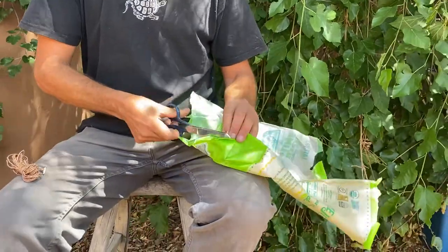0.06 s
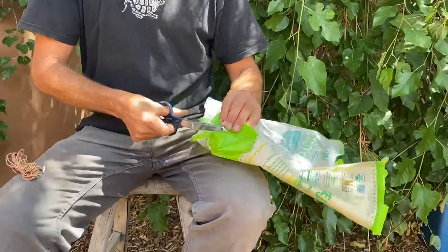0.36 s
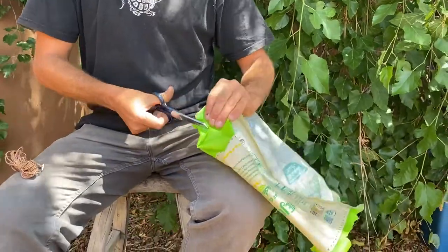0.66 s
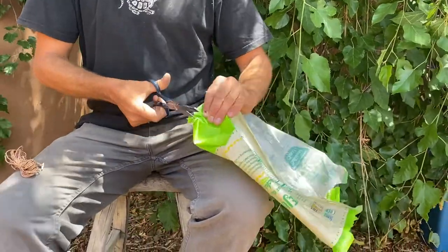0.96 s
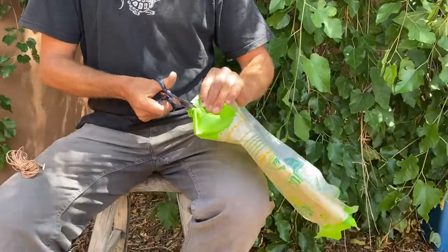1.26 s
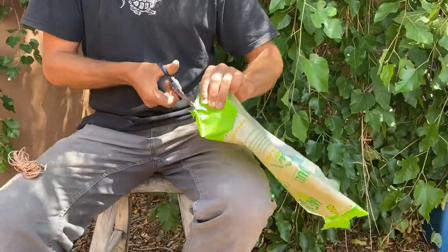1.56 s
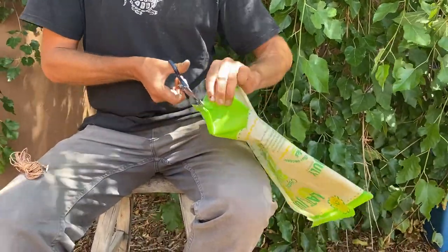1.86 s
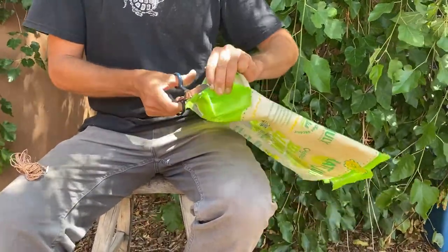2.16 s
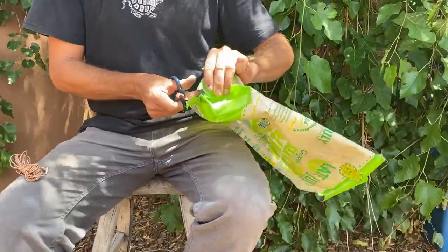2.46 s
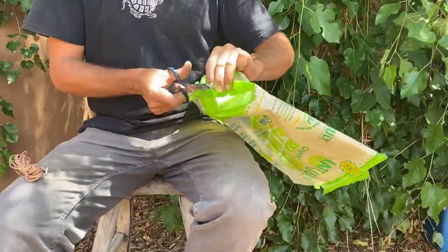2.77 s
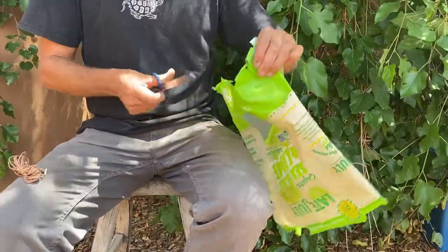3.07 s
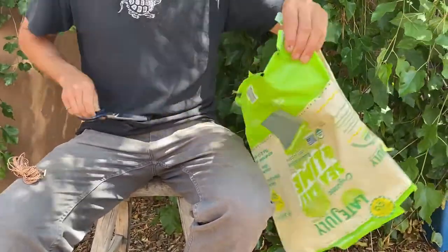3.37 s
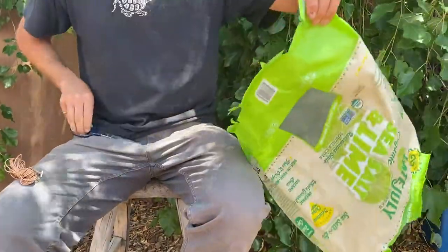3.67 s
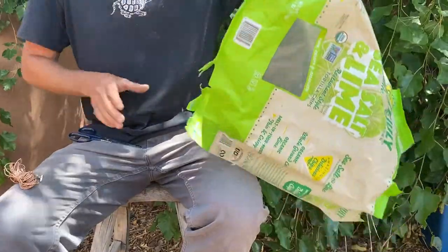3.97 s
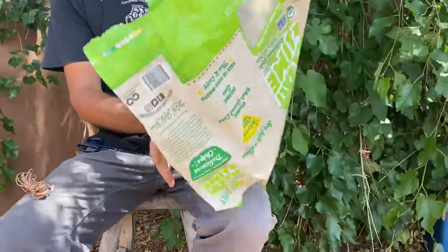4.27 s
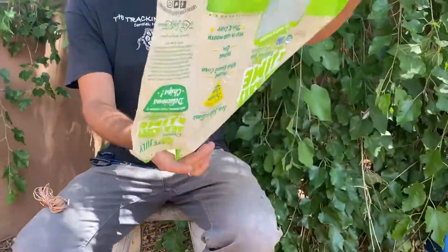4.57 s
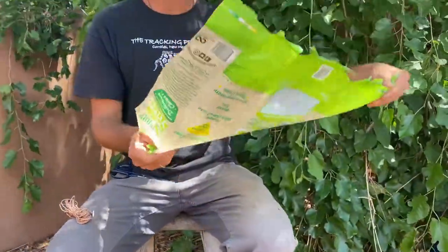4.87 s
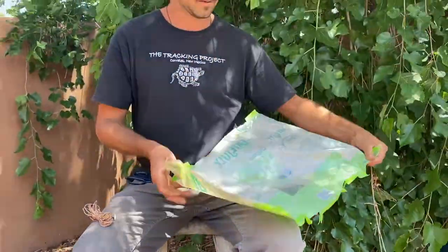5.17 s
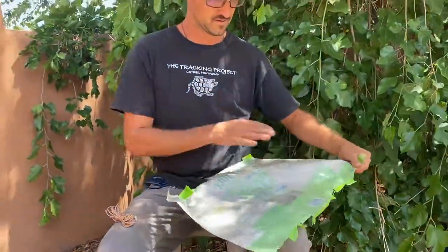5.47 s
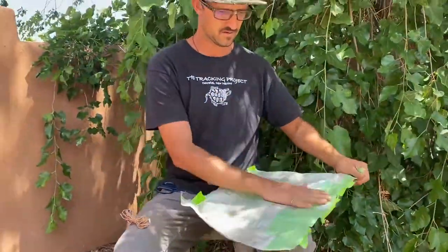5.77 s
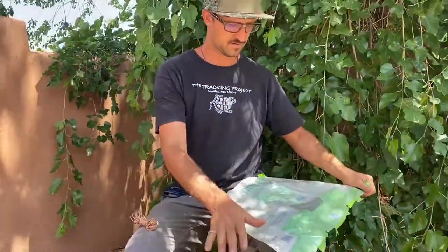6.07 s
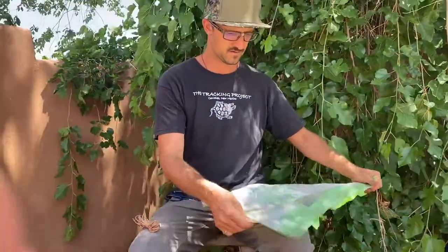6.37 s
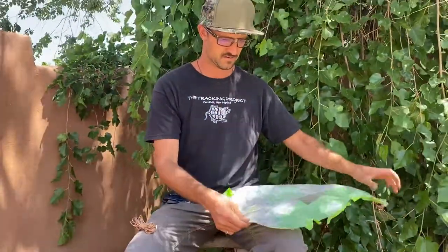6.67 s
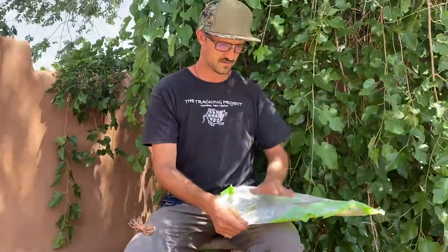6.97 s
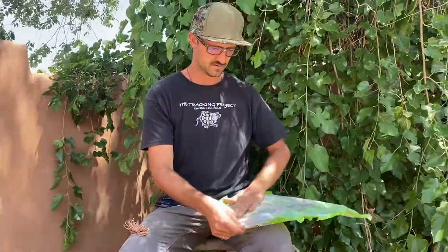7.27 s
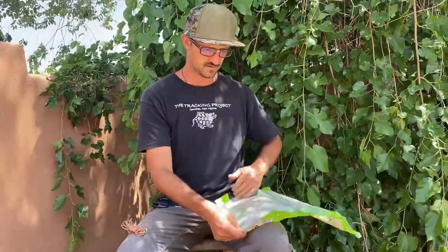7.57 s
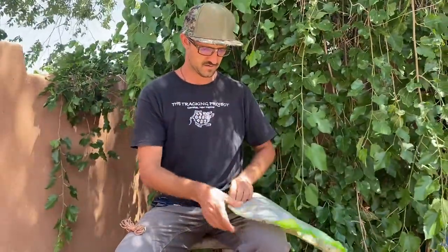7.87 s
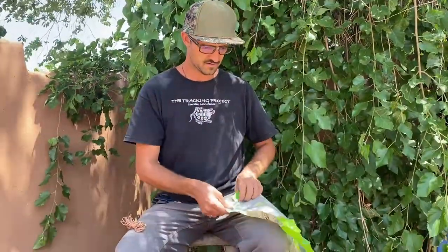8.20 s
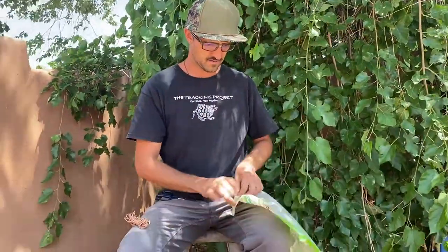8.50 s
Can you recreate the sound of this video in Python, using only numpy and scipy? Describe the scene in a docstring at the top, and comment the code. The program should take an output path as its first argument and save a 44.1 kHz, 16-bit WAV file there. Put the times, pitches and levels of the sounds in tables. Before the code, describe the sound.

A foil snack bag is handled close to the microphone over a faint, steady garden background. Sharp snaps and crinkles come as scissors cut it, strongest around 0.3 to 0.9 seconds, then scattered until another cluster near 2.8 seconds. A low puff of wind hits the microphone at about 2.9 seconds. The bag rustles more softly as it is unfolded, then crackles loudly between 4.5 and 5 seconds. From about 5.6 to 6 seconds a palm smooths the sheet over a knee, making a bright hiss with a low, hollow scuff; a brief second swipe follows at 6.4 seconds. From 7 seconds to the end at about 8.7, lighter sliding, crinkles and single snaps continue as the sheet is handled. The breeze also bumps the microphone gently around 1.2, 7.4 and 8.5 seconds.

```python
"""Sharp snaps sound over a quiet garden: a foil snack bag is snipped open, unfolded and smoothed on the lap.
Buckling creases release impulses that ring the facets of the film, as single snaps and swarms of crinkles.
Friction makes the film hiss under the hand, and the palm rubs a low scuff from the sheet on the knee.
A light breeze puffs on the two microphone ports as its eddies pass."""
import sys
import numpy as np
from scipy import signal
from scipy.fft import rfft, irfft
from scipy.io import wavfile
from scipy.ndimage import uniform_filter1d

SR = 44100
rng = np.random.default_rng(int(sys.argv[2]) if len(sys.argv) > 2 else 0)


def wrap_up_sound(samples):
    """Save the sound to the file named by the first command line argument, as 16-bit audio."""
    columns = np.atleast_2d(samples).T
    # keep every value between -1 and 1, then stretch to whole-number steps
    tamed = np.clip(columns, -1, 1)
    steps = np.round(tamed * 32767).astype(np.int16)
    wavfile.write(sys.argv[1], SR, steps)


N = 381024

# loud snaps under blades and fingers: t/s, level/dB, treble-over-bass tilt/dB per band, nominal length/ms
LOUD_SNAPS = [(.0041, -39, -7, 3.3), (.0374, -44.5, -3, .6), (.169, -50.5, 3, .6),
              (0.1946, -40, -0.5, 0.89), (.2915, -46, -0.5, 0.63), (.3037, -29.5, 1, 1.15),
              (0.3518, -30, -0.5, 1.2), (.386, -25, 2.5, .9), (0.3878, -25, -0.5, 1.2),
              (0.4296, -31.5, 7, 0.26), (.5063, -39.5, 4, 0.95), (.5439, -29.5, 3.5, 0.75),
              (.705, -51.5, -6.5, 2.2), (0.7678, -38.5, -3, 1.02), (0.7807, -41, -2, 0.77),
              (.8508, -35, 1.5, 3.6), (1.1752, -44, -13, 2.4), (1.1859, -35, -2.5, 0.75),
              (1.4802, -41, -2.5, 0.43), (1.5116, -46, 0.5, 0.57), (1.5515, -39.5, -4, 0.65),
              (1.6492, -42.5, -8.5, 0.65), (1.7732, -43.5, -7, 1.26), (1.7985, -39.5, -1, 1.13),
              (1.827, -42, -3, 1.43), (1.876, -33, -6.5, 1.43), (1.9607, -46, -6, 4.3),
              (1.99, -35.5, -13.5, 0.61), (2.0578, -31.5, 1.5, 1.74), (2.1649, -41, -4.5, 2.8),
              (2.242, -56.5, -10, 1.5), (2.3868, -44, -4.5, 1.7), (2.4301, -41.5, -1, 1.2),
              (2.4416, -41.5, -4, 0.76), (2.52, -45, 1, 3.4), (2.6545, -46, 4, 0.41),
              (2.6773, -42.5, 2.5, .5), (2.7941, -34, -1.5, 2.4), (2.8181, -30, 0, 1.25),
              (2.8684, -33.5, 1.5, 2.4), (2.889, -36.5, 7, 4.3), (2.9089, -28.5, -5.5, 2.3),
              (3.0028, -39.5, -4, 1.5), (3.395, -50, 0.5, 1), (3.6423, -53.5, -21.5, 3.3),
              (3.6858, -46, -11, 1.7), (3.85, -34.5, 2, 0.37), (4.0739, -50, -11.5, 1.84),
              (4.4996, -32.5, 2.5, 0.35), (4.6746, -47, -3.5, 0.97), (4.7285, -29.5, 1, 0.88),
              (4.7711, -31, -1, 1.2), (4.834, -40, -4, 2.9), (5.026, -60.5, -24.5, 4.1),
              (5.1034, -37.5, -1, 1.75), (5.2155, -39.5, -5.5, 4.7), (5.3, -46, 1.5, 3.07),
              (5.3678, -42.5, 1.5, 2.23), (5.4034, -45.5, -5, 1.4), (5.6729, -40, -1.5, 1.9),
              (5.7509, -41.5, 5.5, 0.27), (5.8972, -33, 1, 1.7), (5.9086, -30.5, 5.5, .4),
              (6.089, -48.5, -4.5, 2.8), (6.333, -50, -6.5, 1.9), (6.6661, -42, 0.5, 1.4),
              (6.6843, -39.5, -3.5, 4), (6.78, -52, -4, 1.6), (6.898, -54.5, -3.5, 0.7),
              (7.0642, -40, 0, 1.48), (7.0846, -41.5, -0.5, 1.4), (7.1072, -39.5, 2, 1.43),
              (7.1907, -36.5, 4.5, 0.96), (7.3193, -35, -3, 1.86), (7.4178, -41, 0.5, 0.97),
              (7.8878, -41.5, -3, 0.51), (7.9254, -37.5, 2, 1.2), (7.9357, -34.5, 1.5, 0.42),
              (7.9791, -45, 3.5, 0.58), (8.0065, -41.5, 0.5, 0.99), (8.1708, -39, 3.5, .3),
              (8.251, -39.5, -0.5, 2), (8.265, -41, -0.5, 0.37), (8.408, -40.5, 0, .3),
              (8.5947, -33.5, -2, 0.77)]
# bass, middle and treble bands of a snap: lower f/Hz, upper f/Hz
SNAP_BANDS = [(400, 1800), (1800, 7500), (7500, 16500)]
# spectrum of the garden background: f/Hz, relative level/dB
GARDEN_SPECTRUM = [(25, -12), (90, 1), (160, -11), (300, -15), (700, -13), (1500, -25.5), (4000, -28.5),
                   (9000, -34), (16000, -43)]
# fingers grip, bend or fold the bag: t/s, duration/s, flexing level/dB, sliding relative to it/dB
CRUMPLES = [(0.097, .02, -51, -12), (.18, 0.15, -52.5, -4), (0.266, 0.032, -53.5, -6),
            (.335, 0.012, -42, -7.5), (0.372, 0.064, -41.5, -3.5), (0.544, 0.073, -45, -8),
            (0.829, .03, -40.5, -9), (0.885, .08, -50, -1), (1.165, 0.017, -46, -18),
            (1.244, 0.031, -40, -23), (1.34, 0.044, -48.5, -10.5), (1.501, 0.18, -50.5, -15.5),
            (1.752, 0.3, -46.5, -11), (1.986, 0.086, -41, -9.5), (2.148, 0.016, -53.5, -2),
            (2.393, 0.029, -51.5, -2.5), (2.497, .02, -46, -24), (2.657, 0.065, -54, -1.5),
            (2.779, .085, -43.5, -3), (2.862, 0.053, -36.5, -5), (3.224, 0.092, -50.5, -17),
            (3.431, 0.23, -56.5, -2.5), (4.138, 0.098, -49, -5.5), (4.282, .02, -54.5, -22.5),
            (4.384, 0.026, -52, -25), (4.66, 0.31, -47.5, -4), (4.712, 0.056, -40, -2),
            (4.886, 0.026, -37, 0.5), (4.901, 0.016, -25, -3.5), (4.984, 0.33, -48.5, -7.5),
            (5.355, 0.082, -56, -10), (6.494, .025, -46, 5.5), (6.603, 0.018, -55, 6),
            (6.657, .06, -50.5, -2), (8.231, 0.033, -47.5, -3), (8.322, 0.023, -48, -3),
            (8.602, 0.029, -49, -1)]
# the sheet slides under the hand or on the lap: t/s, duration/s, sliding level/dB, relative flexing/dB
STROKES = [(3.04, .36, -64, 1), (3.867, .3, -56, -7.5), (5.65, 0.12, -42.5, 4), (5.729, .285, -37.5, -5),
           (5.853, 0.059, -35, -8.5), (6.311, .04, -56, 3), (6.353, 0.042, -46, -2), (6.379, .06, -34, -2),
           (7.049, 0.11, -48, 1), (7.17, .33, -45, -2), (7.3, 0.058, -43, -1), (7.552, 0.0263, -40.5, -9),
           (7.583, 0.045, -52.5, 7), (7.661, .19, -63, 3), (7.83, .1, -49, 0), (8.019, .14, -48.5, -1.5),
           (8.47, 0.053, -41.5, -6)]
# spectrum of broad panels flexing: f/Hz, relative level/dB
FLEX_SPECTRUM = [(170, 0.5), (260, -4.5), (380, -6), (620, -3), (1000, -1), (1500, -3.5), (2200, -5.5),
                 (3200, -13.5), (5000, -25.5), (9000, -87)]
# spectrum of film sliding on skin, cloth and itself: f/Hz, relative level/dB
SLIDE_SPECTRUM = [(300, -9.5), (1200, -3), (2800, 1.5), (4800, 2), (6500, -1.5), (9500, -2.5),
                  (12500, -5.5), (16000, -22)]
# the bag as the two ports hear it: f/Hz, left-minus-right level/dB, left phase lead/rad
PORT_RESPONSE = [(357, 0.5, -1), (857, 9.5, -1), (2020, 2.5, -0.5), (3950, -5, 0.37), (6200, 11, -2.45),
                 (6100, 4, -1.26), (10100, 0.5, -1.85), (12000, -25, -0.4), (11740, 0, -0.5),
                 (15300, 0, -0.5)]
# gusts on the ports: t/s, duration/s, level/dB
GUSTS = [(.24, 0.28, -46), (.68, 0.058, -50.5), (1.2, 0.094, -36.5), (1.32, .22, -41.5), (1.99, 0.054, -43),
         (2.79, 0.082, -35), (2.87, 0.25, -25.5), (3.22, 0.25, -44), (7.37, 0.069, -29),
         (7.47, 0.31, -32.5), (8.55, 0.1, -32)]
# spectrum of eddies at the ports: f/Hz, relative level/dB
EDDY_SPECTRUM = [(18, -12), (35, -2.5), (65, 2), (115, -3.5), (180, -14), (300, -27), (600, -65.5)]
# the palm presses the sheet along the knee: t/s, level/dB
PALM_PRESS = [(5.6, -91.5), (5.68, -50.5), (5.76, -38.5), (5.88, -54.5), (6.02, -57), (6.1, -97)]


def from_db(db):
    """Amplitude ratio: tenfold for every 20 dB."""
    return 10 ** (np.asarray(db) / 20)


def unit_rms(x):
    """Normalisation to unit mean power."""
    return x / np.sqrt(np.mean(x ** 2) + 1e-20)


def at_hz(table, hz, column=1):
    """Interpolation of a table column on a logarithmic frequency axis."""
    table = np.array(table)
    return np.interp(np.log(hz + 1), np.log(table[:, 0]), table[:, column])


def drift(rate_hz):
    """Slow random modulation: low-passed noise of unit rms."""
    step = 40  # samples per control point
    pole = np.exp(-2 * np.pi * rate_hz * step / SR)
    slow = signal.lfilter([1], [1, -2 * pole, pole * pole], rng.standard_normal(N // step + 2002))[2000:]
    return np.interp(np.arange(N) / step, np.arange(len(slow)), unit_rms(slow))


def noise(spectrum, channels=1):
    """Spectral shaping of white noise, uncorrelated between channels, to unit rms."""
    gain = from_db(at_hz(spectrum, np.fft.rfftfreq(N, 1 / SR)))
    return unit_rms(irfft(rfft(rng.standard_normal((channels, N))) * gain, N))


def resonate(x, hz, q):
    """Forced response of a damped oscillator with unit peak gain."""
    pole = np.exp(-np.pi * hz / q / SR)
    feedback = [1, -2 * pole * np.cos(2 * np.pi * hz / SR), pole * pole]
    return signal.lfilter(np.array([1, 0, -1]) * (1 - pole * pole) / 2, feedback, x + 1e-18)


def swells(events, attack_s, settle_db_per_s):
    """Incoherent addition: the powers of events (t/s, duration/s, level/dB) rise, hold, decay and sum."""
    t, power = np.arange(N) / SR, np.zeros(N)
    for start, length, level_db in events:
        rise = np.clip((t - start) / attack_s, 0, 1)
        fall_db = np.clip(settle_db_per_s * (t - start - length), 0, 120)
        power += (rise * from_db(level_db - fall_db)) ** 2
    return power


def snaps(rows, crack, flutter, tail_db, tail_ms, q, direct, band_db, soft_hz, facets=4):
    """Snap-through buckling: a crease cracks, the film flutters on and new facets ring each time."""
    out, ms = np.zeros(N + SR), np.arange(SR // 20) / SR * 1000
    bands = [signal.butter(2, edges, "band", fs=SR, output="sos") for edges in SNAP_BANDS]
    for start_s, snap_db, tilt_db, length_ms in rows:
        levels_db = snap_db + np.array(band_db) + tilt_db * np.array([-1, 0, 1])
        decay = np.exp(-ms / (flutter * max(length_ms, .1))) + from_db(tail_db) * np.exp(-ms / tail_ms)
        push = rng.laplace(size=len(ms)) * decay
        push[0] += crack * rng.choice([-1, 1])
        # soft creases flip slowly, lose their top and bend broader facets
        top_hz = np.clip(soft_hz * from_db(levels_db[2] - levels_db[1]), SR / 8, SR * .45)
        push = signal.lfilter(*signal.butter(2, top_hz, fs=SR), push)
        softness = from_db(np.clip(levels_db[0] - levels_db[2], -15, 15) / 3)
        start = max(round(start_s * SR), 0)
        for (low, high), band, level_db, bias in zip(SNAP_BANDS, bands, levels_db, (.5, softness, 1)):
            place_in_band = ((np.arange(facets) + rng.random(facets)) / facets) ** bias
            ringing = sum(resonate(push, hz, q) for hz in low * (high / low) ** place_in_band)
            sound = signal.sosfilt(band, direct * push + ringing)
            out[start:start + len(ms)] += from_db(level_db) * unit_rms(sound)
    return out[:N]


def lesser_snaps(flex_db, busy_db, level_db, follows, crowding, spread_db, tilt_db, length_ms, count=60):
    """Random buckling: rows like LOUD_SNAPS, denser and louder as the flexing rises to busy_db."""
    slack_db = np.minimum(flex_db - busy_db, 0)
    chance = np.cumsum(from_db(crowding * slack_db))
    onsets = np.searchsorted(chance, rng.random(count) * chance[-1])
    size_db, colour_db = rng.standard_normal((2, count)) * spread_db
    levels_db = level_db + follows * slack_db[onsets] + size_db
    return [(i / SR, db, tilt_db + tilt, length_ms) for i, db, tilt in zip(onsets, levels_db, colour_db)]


def garden(level_db):
    """Ambient noise: a steady, mostly low background, uncorrelated at the two ports."""
    return from_db(level_db) * noise(GARDEN_SPECTRUM, channels=2)


def handling():
    """Flexing and sliding levels/dB by addition of powers: each crumple and stroke does some of both."""
    crumple = dict(attack_s=.015, settle_db_per_s=259.5)
    stroke = dict(attack_s=.027, settle_db_per_s=274)
    held_flex, held_slide = from_db([-63, -71.5]) ** 2  # the bag stirs even while it is only held
    flex = swells([(t, length, db) for t, length, db, _ in CRUMPLES], **crumple)
    flex += swells([(t, length, db + share) for t, length, db, share in STROKES], **stroke)
    slide = swells([(t, length, db) for t, length, db, _ in STROKES], **stroke)
    slide += swells([(t, length, db + share) for t, length, db, share in CRUMPLES], **crumple)
    return 10 * np.log10(flex + held_flex), 10 * np.log10(slide + held_slide)


def crinkles(spectrum, per_s, size_db, q, octaves, facets=30):
    """A Poisson process: tiny creases give way, each ringing the facets near a pitch of its own."""
    onsets = np.flatnonzero(rng.random(N) < per_s / SR)
    sizes = from_db(size_db * np.minimum(rng.exponential(1, N), 3.5))[onsets]
    facets_hz = np.geomspace(200, 15500, facets)
    home_hz = rng.choice(facets_hz, N)[onsets]
    strengths, out = rng.standard_normal(N + facets), np.zeros(N)
    for k, hz in enumerate(facets_hz):
        clicks = np.zeros(N)
        clicks[onsets] = sizes * strengths[onsets + k] / (1 + (np.log2(hz / home_hz) / octaves) ** 2)
        out += from_db(at_hz(spectrum, hz)) * resonate(clicks, hz, q)
    # the hand's work is shared among the creases that give way at about the same time
    power = uniform_filter1d(uniform_filter1d(out ** 2, size=1500), size=1500)
    return out / np.sqrt(np.maximum(power, 0) + np.mean(out ** 2) / 100)


def flexing(flex_db):
    """Buckling of bent panels: clusters of dull ticks, denser under harder work, over a soft rustle."""
    per_s = 520 * from_db(1.15 * (flex_db + 45) + 6 * drift(16))
    ticks = crinkles(FLEX_SPECTRUM, per_s, size_db=6.0, q=12.6, octaves=0.83)
    rustle = noise(FLEX_SPECTRUM)[0]
    return from_db(flex_db) * (from_db(1) * ticks + from_db(-7.5) * rustle)


def sliding(slide_db, brightening, top_db):
    """Sliding friction: the film hisses, brighter when it moves fast, and catches in fine ticks."""
    per_s = 950 * from_db(.95 * (slide_db + 50) + 3.4 * drift(18))
    ticks = crinkles(SLIDE_SPECTRUM, per_s, size_db=6.0, q=4.2, octaves=1.3)
    hiss = noise(SLIDE_SPECTRUM)[0] * from_db(3.1 * drift(25))
    friction = from_db(-3) * ticks + from_db(-2) * hiss
    dull = signal.sosfiltfilt(signal.butter(2, 8500, fs=SR, output="sos"), friction)
    treble_gain = from_db(top_db + brightening * (slide_db + 28))
    return from_db(slide_db) * (dull + (friction - dull) * treble_gain)


def port_shading(x):
    """Diffraction: the microphone body shades and delays each port differently, smoothly with pitch."""
    hz = np.fft.rfftfreq(N, 1 / SR)
    response = np.array([from_db(at_hz(PORT_RESPONSE, hz)), at_hz(PORT_RESPONSE, hz, column=2)])
    ratio, lead = uniform_filter1d(response, size=5000)
    pair = np.array([ratio * np.exp(.5j * lead), np.exp(-.5j * lead)]) * np.sqrt(2 / (1 + ratio ** 2))
    return irfft(rfft(x) * pair, N)


def crease_spread(x):
    """An extended source: creases lie all over the sheet, so level and phase shift between the ports."""
    shifting = drift(39) + 1j * drift(37)
    return np.real(signal.hilbert(x) * shifting) * np.array([[1], [-1]])


def scatter(x, t60_s, dull_hz):
    """Diffuse reflection: wall, ground and leaves return a short echo, different at each port."""
    t = np.arange(SR // 2) / SR
    echo = rng.standard_normal((2, len(t))) * from_db(-60 * t / t60_s) * (t > .004)
    echo = signal.sosfilt(signal.butter(1, dull_hz, fs=SR, output="sos"), echo)
    echo /= np.sqrt(np.sum(echo ** 2) / 2)
    return signal.oaconvolve(x[None], echo, axes=1)[:, :N]


def breeze(calm_db, lumpy_db, shared_hz):
    """Turbulence: eddies buffet the ports in lumps, and the largest reach both at once."""
    strength = np.sqrt(swells(GUSTS, attack_s=0.031, settle_db_per_s=165) + from_db(calm_db) ** 2)
    both, apart = noise(EDDY_SPECTRUM, channels=2)
    apart = signal.sosfilt(signal.butter(1, shared_hz, "high", fs=SR, output="sos"), apart)
    eddies = both + 1.33 * apart * np.array([[1], [-1]])
    return strength * unit_rms(eddies * from_db(lumpy_db * drift(17.4)))


def palm_scuff(hz, q):
    """Friction drives a broad resonance: rubbed over the knee, the taut sheet scuffs, low and hollow."""
    level_db = np.interp(np.arange(N) / SR, *np.transpose(PALM_PRESS))
    scuff = resonate(resonate(rng.standard_normal(N), hz, q), hz, q)
    return from_db(level_db) * unit_rms(scuff)


def scene():
    """Superposition at the two ports: the bag close in front, its echo, the breeze and the garden."""
    flex_db, slide_db = handling()
    lesser = lesser_snaps(flex_db, busy_db=-48, level_db=-48, follows=0.63, crowding=2.2,
                          spread_db=3.5, tilt_db=-3.5, length_ms=1.0)
    bag = snaps(LOUD_SNAPS + lesser, crack=14.9, flutter=2.25, tail_db=-11.5, tail_ms=7.3,
                q=7.3, direct=0.41, band_db=(-8.0, -4.3, -8.5), soft_hz=12100)
    bag += flexing(flex_db)
    bag += sliding(slide_db, brightening=0.09, top_db=-1.0)
    bag += palm_scuff(hz=193, q=1.73)
    echo = from_db(-22.5) * scatter(bag, t60_s=0.21, dull_hz=6000)
    background = garden(level_db=-53.5)
    direct = port_shading(bag) + from_db(-9) * crease_spread(bag)
    return direct + echo + breeze(calm_db=-58, lumpy_db=2.5, shared_hz=83.5) + background


def record(dry):
    """Band limiting: an elliptic low-pass filter cuts the top steeply."""
    cutoff_hz = 16300
    return signal.sosfilt(signal.ellip(10, .1, 80, cutoff_hz, fs=SR, output="sos"), dry)


dry = scene()
out = record(dry)
wrap_up_sound(out)
```